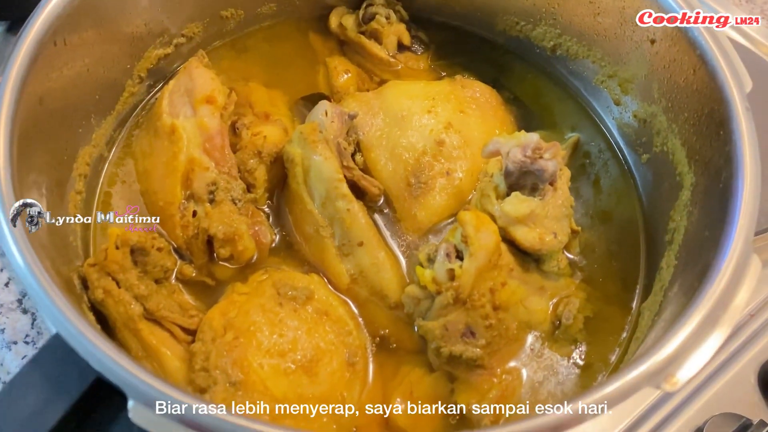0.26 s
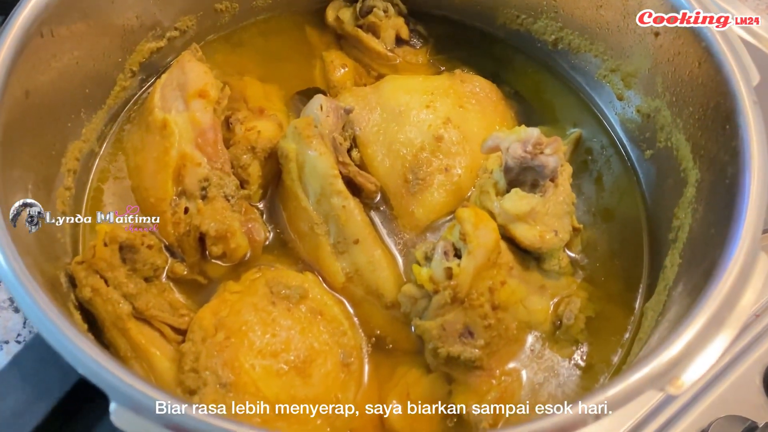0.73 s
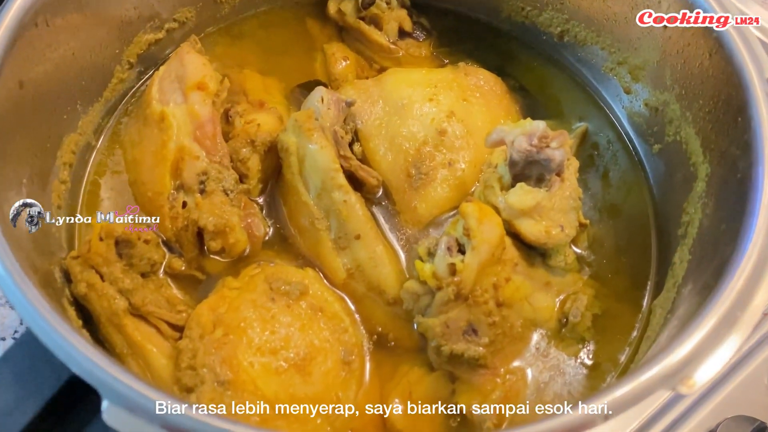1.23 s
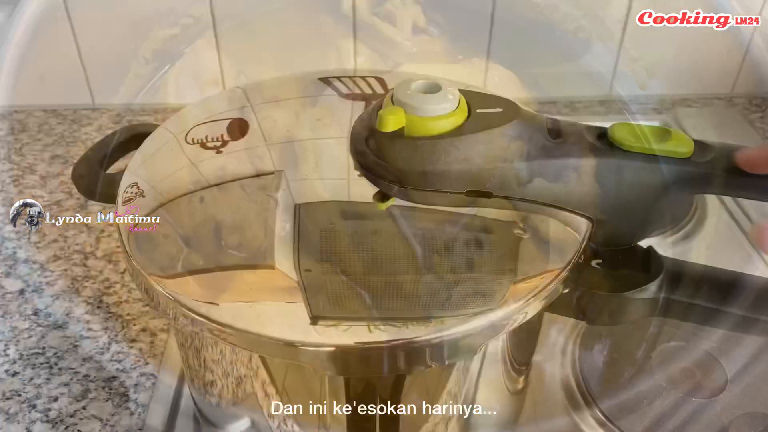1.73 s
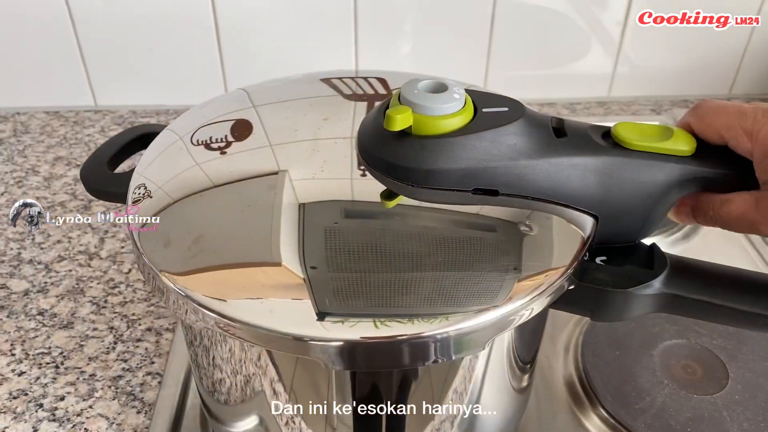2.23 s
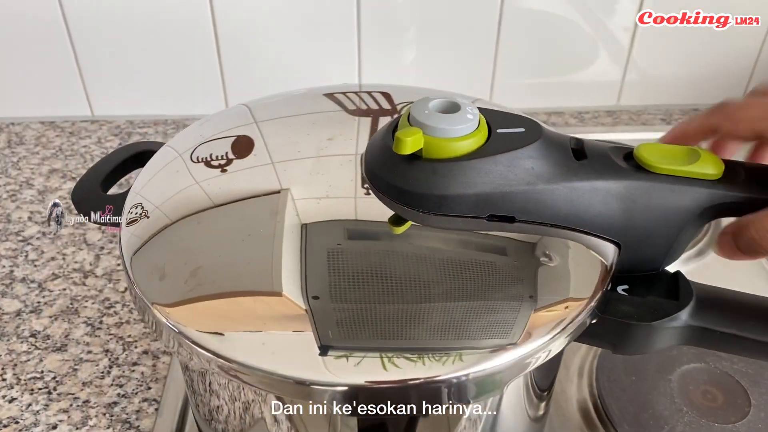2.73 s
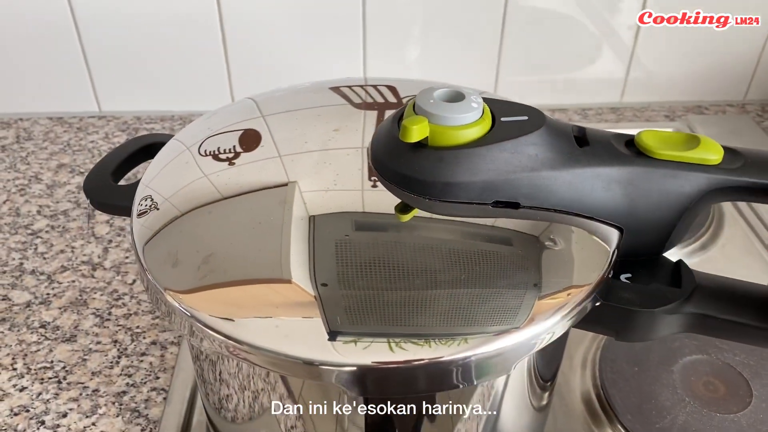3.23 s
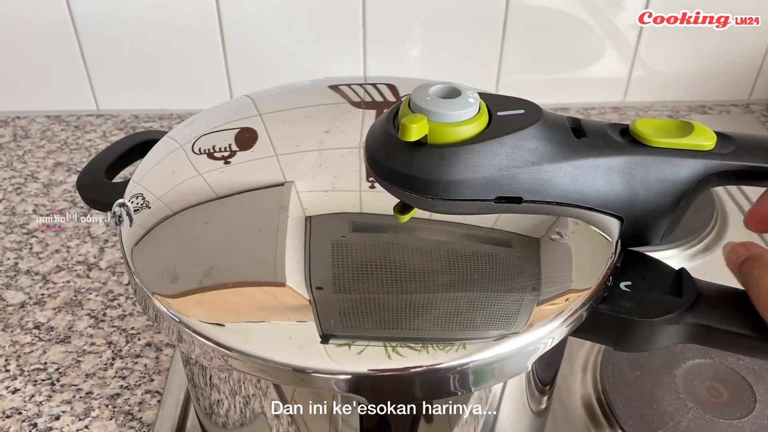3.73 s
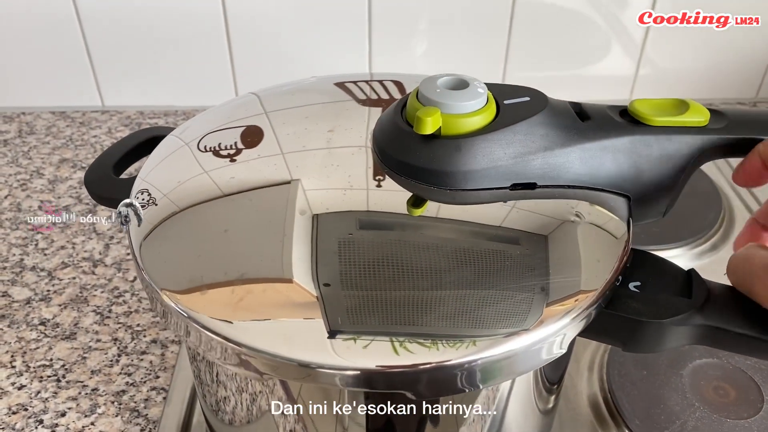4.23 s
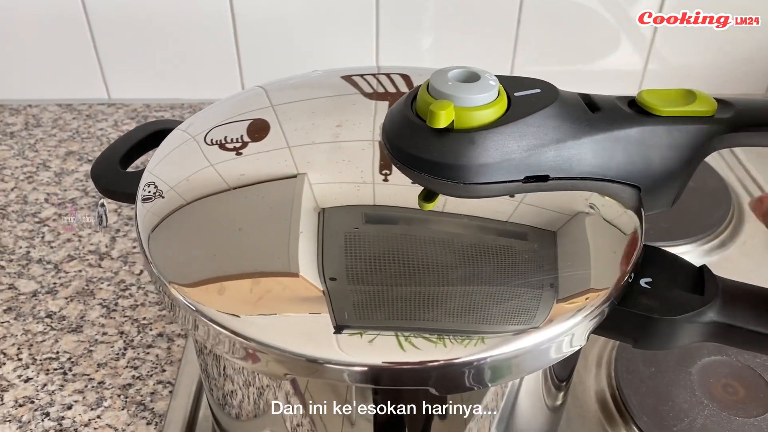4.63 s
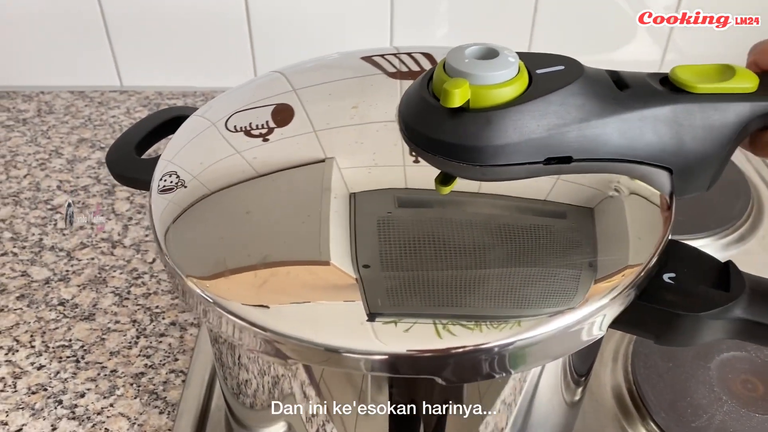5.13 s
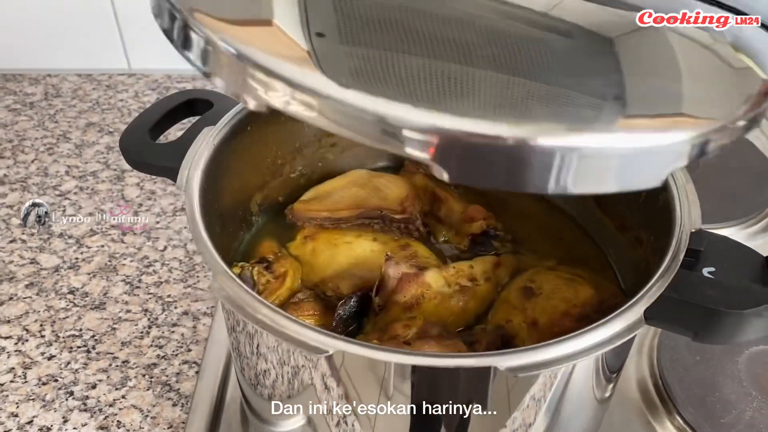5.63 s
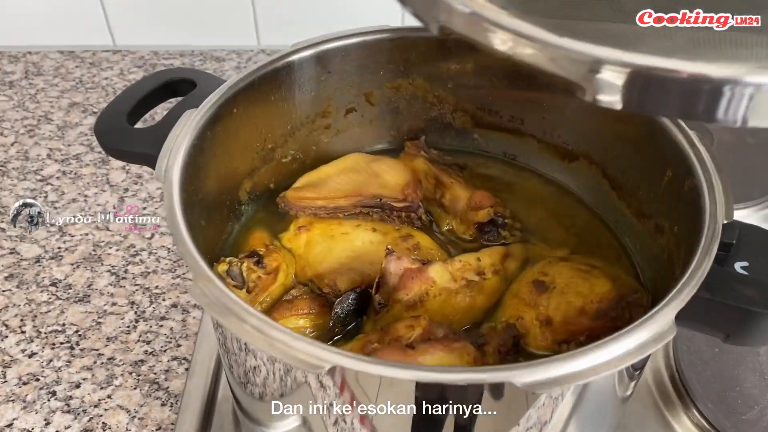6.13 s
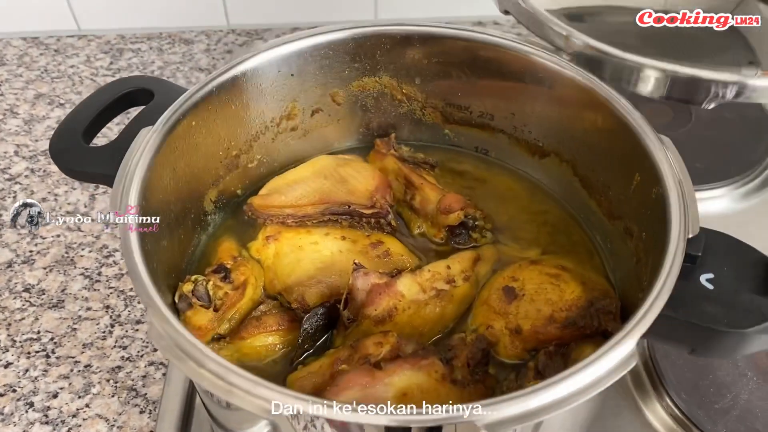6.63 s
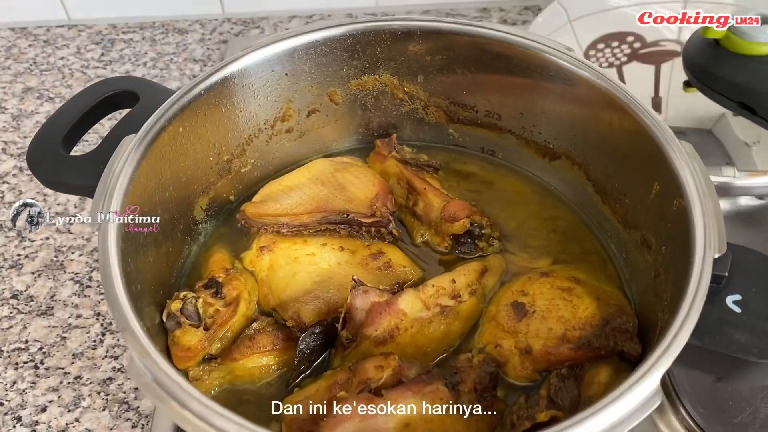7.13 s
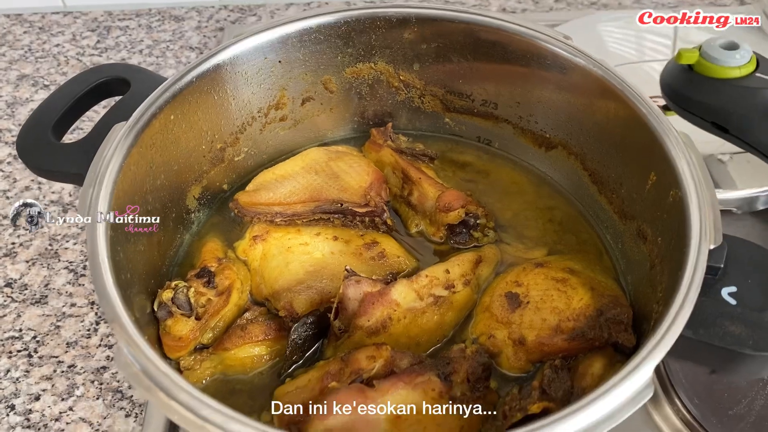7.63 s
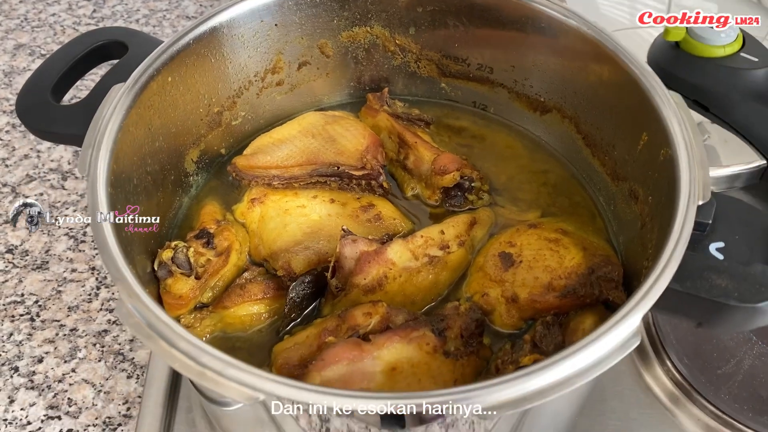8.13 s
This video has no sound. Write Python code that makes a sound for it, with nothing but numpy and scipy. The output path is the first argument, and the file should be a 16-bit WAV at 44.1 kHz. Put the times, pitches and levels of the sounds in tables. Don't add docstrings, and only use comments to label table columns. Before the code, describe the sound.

Near silence with faint finger rubs, then latch clicks, metal lid knocks on a pot rim, a loud clack, and a rocking landing on a worktop.

```python
import sys
import numpy as np
from scipy import signal
from scipy.fft import rfft, irfft, next_fast_len
from scipy.io import wavfile
from scipy.ndimage import uniform_filter1d, map_coordinates

SR = 44100
rng = np.random.default_rng(int(sys.argv[2]) if len(sys.argv) > 2 else 0)


def materialize(psi):
    bounded = np.clip(np.atleast_2d(psi).T, -1, 1)
    quanta = np.round(bounded * 32767).astype(np.int16)
    wavfile.write(sys.argv[1], SR, quanta)


def convert_level_to_amplitude(level_db):
    exponent = np.asarray(level_db, float) / 20
    return 10 ** exponent


N = 369191

# pitch_hz, level_db, t60_s (time to fade by 60 dB)
HANDLE_MODES = [(466, -3.5, 0.34), (794, -7, 0.044), (840, -11.5, 0.99), (1385, -15.5, 0.1),
                (1768, 9.5, 0.036), (2565, -9, 0.51), (3810, -14.5, 0.25), (5250, -22.5, 0.07),
                (6300, -13, 0.073), (7574, -13.5, 0.2)]
POT_MODES = [(389.7, 1, 0.58), (548, -19, 0.23), (850, -5.5, 0.069), (1486, -4.5, 0.24),
             (1817, -1.5, 0.065), (2360, -25, 0.148), (2508, -12, 0.056), (2830, -5, 0.061),
             (4080, -20, 0.1243), (4560, -35.5, 0.14), (4850, -24, 0.174), (5520, -16, 0.14),
             (6130, -31, 0.13), (6370, -25, 0.15)]
LID_MODES = [(1388, -17, 0.15), (1660, 1, 0.084), (1870, -17, 0.15), (2341, -14.5, 0.11),
             (2640, -8.5, 0.14), (2810, -6.5, 0.087), (3510, -10, 0.16), (3940, -9, 0.16),
             (4380, -16.5, 0.098), (5660, -7.5, 0.068), (5950, -22.5, 0.39), (6474, -18.5, 0.15),
             (7300, -12.5, 0.062), (7300, -20.5, 0.17)]
ROCKING_LID_MODES = [(492.7, -7.5, 0.22), (684, -8.5, 0.24), (733, -10, 0.17), (855, -11.5, 0.25),
                     (998, -15.5, 0.08), (1600, 1.5, 0.035), (1839, -9, 0.15), (2310, -27, 0.13),
                     (2595, -13, 0.14), (2830, -2, 0.065), (3415, -6, 0.034)]
WORKTOP_MODES = [(85, 2, .26), (102.5, -3, .18), (176.5, -11, .16), (226, -9, 0.13), (265.4, -11, .11)]
GRIP_MODES = [(508, -8, 0.039), (1550, 0, 0.06), (2468, 5, 0.059), (2970, -5, 0.038), (6440, -3, .06)]
LANDING_LID_MODES = [(520, -5, 0.18), (664, -34, 2.8), (711, -8.5, 0.24), (1030, -6.5, 0.24),
                     (1160, -30, 1.0), (1164, -21, 0.46), (1350, -13, 0.25), (1880, -22, 0.46),
                     (2370, -23, 0.21), (2773, -13, 0.092), (3795, -46, 0.29), (4867, -44, 0.15)]
FLAT_LID_MODES = [(843, -3.5, 0.093), (1505, -1, 0.26), (1930, -0.5, 0.11), (1990, -6, 0.13),
                  (2258, -14, 0.21), (2490, -12, 0.27), (2600, -6.5, 0.14), (2750, -4, 0.073),
                  (2790, -6, 0.17), (3070, -4.5, 0.13), (3820, -16, 0.07), (5170, -12.5, 0.17)]

# pitch_hz, level_db (per Hz)
HANDLE_CRACK = [(120, -29.5), (200, -19), (335, -22.5), (715, -16), (997, -17.5), (1770, -9), (2090, -16.5),
                (2250, -19), (11400, -24.5), (15600, -28), (16500, -57)]
POT_CRACK = [(120, -22.5), (200, -11.5), (300, -25.5), (382, -9), (628, -18), (2560, -22.5), (3630, -28.5),
             (6090, -26), (13500, -30.5), (15300, -31), (16500, -37)]
LID_CRACK = [(120, -50.5), (200, -20), (829, -20), (1340, -7.5), (1470, -19.5), (1670, -14.5),
             (2010, -15.5), (2860, -13.5), (11800, -23), (15300, -27), (16500, -37.5)]
WORKTOP_CRACK = [(120, 8), (200, 1), (329, -7.5), (829, -3), (1160, -4.5), (1500, -5.5), (3020, -16),
                 (11200, -26), (13500, -24), (15300, -28.5), (16500, -53.5)]
BUMP_CRACK = [(120, -26), (250, -2), (742, -5), (926, -10), (1250, -8), (2090, -25), (10200, -48),
              (15600, -46), (16500, -55)]
FLAT_CRACK = [(150, -31.5), (250, -4), (622, -5), (853, -1.5), (2860, -7.5), (11000, -22.5), (12900, -47.5),
              (15700, -27), (16500, -49.5)]

# start_s, peak_db, hollow_knock_db, low_thump_db, brightness_db
LATCH_CLICKS = [(1.6282, -67.5, -2, -4, -22), (1.9914, -61, 8.5, -14, -27), (2.5865, -53, -17, -11, -1),
                (2.9038, -56, 6, -22, -10), (2.9567, -59.5, 2, -3, -20), (2.9844, -66.5, -31, -6, -11),
                (3.0794, -68, -6, 17, -40), (3.1443, -55.5, -3, -15, -12), (3.1637, -41.5, 6, -7, -23.5),
                (3.6396, -66.5, 7, -14, -5), (3.8272, -66, 6, -2, -9), (4.1044, -42.5, 9.5, -10, -13),
                (4.1644, -64, -19, 7, -55), (4.2752, -44, 1.5, 4, -5), (4.3141, -27.5, -4.5, -5.5, -10.5)]
RIM_KNOCKS = [
    (4.9162, -40.5, -16.5, -14, -18.5),
    (4.9495, -37.5, -3.5, -16, -9.5),
    (4.9878, -45.5, -2.5, -16, -22.5),
    (5.0601, -30, -9, -30.5, -7.5),
    (5.1823, -38.5, -1.5, -23, -5),
    (5.2047, -40.5, -6, -25, -10.5),
    (5.2238, -47.5, -6, -3, -11),
]
LID_CLACKS = [
    (4.8597, -53, 6, -6, -4),
    (5.4001, -73.5, 23.5, 3, -31),
    (5.4703, -70.5, 34, 8, -54),
    (6.5108, -14.5, -13, -39, -15),
    (6.5289, -23, -14, -17, -17),
]
LID_CHATTER = [
    (6.5175, -20, -24, -34, -22),
    (6.556, -35, -18.5, -31, -19.5),
]
LID_LANDING = [
    (7.2765, -35.5, 0.5, 13.5, -36),
    (7.429, -17.5, -2.5, -1.5, -12),
    (7.577, -42, -3, -25, -36.5),
    (7.595, -43.5, -6, -25, -29.5),
]
LID_ROCKS = [
    (7.8611, -26, 0.5, 7.5, -16.5),
    (7.911, -34.5, -3, 8, -13.5),
    (7.947, -37.5, -2, 6, -13),
    (7.973, -38, 4, -8, -25),
    (7.995, -54.5, 7, -5, -20),
    (8.016, -40, 7, -23, -32),
    (8.0359, -18, 5, 16, -19.5),
    (8.0535, -16.5, -4.5, 13, -11),
]
LID_FALL = [
    (8.1305, -14.5, -5.5, -32, -15),
    (8.143, -23.5, 8, 6, -18.5),
    (8.195, -52, 6, 16.5, -15),
]
GRIP_TAPS = [
    (1.42, -70, 14, -12, -60),
    (5.742, -79, -13, 2, -19),
    (5.7697, -60, 23, -3.5, -53),
    (6.328, -53, 8.5, -0.5, -12.5),
    (6.335, -57.5, -2.5, -9.5, -9),
    (6.394, -70, 7.5, -10, -17),
    (7.0782, -80.5, -16, -8, -13),
]

# start_s, peak_db, hollow_knock_db, brightness_db, contact_ms
SOFT_BUMPS = [
    (0.973, -61, 2, -55, 54),
    (1.782, -62, 2, -52, 50),
    (3.885, -58, 0, -30, 50),
]
LATCH_GRAZES = [
    (1.659, -86, -20, 11, 5),
    (3.121, -66, -40, -7, 29),
    (3.757, -59, 14, -24, 18),
    (4.08, -54.5, -15, -14.5, 32),
    (6.501, -46.5, -29, -21.5, 16),
]
LANDING_SCUFFS_ON_TOP = [
    (7.423, -52, -10, -23, 10),
    (7.452, -24, 1.5, -25, 4.6),
    (7.49, -33.5, -3, -14, 15),
    (7.58, -43, -8.5, -19, 38),
]
ROCKING_SCUFFS = [
    (8.002, -36, 1, -13, 41),
    (8.079, -22.5, 1, -17, 12),
    (8.118, -35.5, -4, -17.5, 16),
    (8.7, -35, -39, -3, 15),
]

# start_s, peak_db, pitch_hz, t60_s
PING_TOUCHES = [(3.882, -55, 600, 0.041), (3.893, -51, 790, 0.054), (3.912, -49, 660, 0.065),
                (3.955, -47.5, 553, 0.055), (4.009, -50.5, 850, 0.055), (4.045, -55.5, 486, 0.105),
                (4.081, -49.5, 1730, 0.1), (4.166, -48.5, 1650, 0.039), (4.86, -49, 1643, 0.079),
                (4.878, -51, 1754, 0.072), (4.917, -43, 1840, .05), (5.061, -38, 1750, 0.048),
                (5.075, -52, 1458, .15), (4.95, -46, 2910, 0.014), (4.989, -48, 2600, 0.017),
                (5.062, -43, 2600, 0.054), (5.205, -45, 2750, 0.033), (5.222, -44, 2800, 0.047),
                (5.222, -54, 5500, 0.1), (5.223, -49, 1950, 0.036), (5.228, -53, 2500, 0.086),
                (5.226, -58, 4000, 0.063), (5.224, -60, 4900, 0.065), (5.224, -58.5, 6760, 0.074),
                (5.262, -53.5, 645, 0.069), (6.529, -20, 1685, .07), (7.275, -47, 1146, 0.035),
                (7.277, -50, 1770, 0.035), (7.429, -33, 2750, 0.054), (7.432, -36, 528, .07),
                (7.863, -41, 735, 0.091), (7.911, -43, 728, 0.091), (7.947, -47, 740, .1),
                (7.975, -51, 2790, 0.045), (7.579, -46, 1140, .05), (7.59, -50, 1100, 0.065),
                (7.591, -46, 724, 0.085), (7.91, -52, 2800, 0.03), (7.946, -57, 2800, 0.049),
                (8.014, -37, 960, 0.033), (8.036, -21, 1580, 0.024), (8.036, -24.5, 986, 0.037),
                (8.054, -34, 713, 0.096), (8.132, -22.5, 2980, 0.037), (8.131, -28, 1939, 0.032)]

# start_s, length_s, scrape_db, fizz_over_scrape_db, drag_over_scrape_db
STROKES = [(0.15, 0.16, -99, -3, 7.5), (1.743, 0.18, -99.5, -4.5, 10), (1.942, 0.36, -94, 0.5, -17),
           (2.254, 0.17, -96, -21, -15), (2.501, 0.11, -87.5, -1.5, 0), (2.966, 0.12, -99, 4, -10),
           (3.129, 0.3, -98, 0.5, 20.5), (3.482, 0.087, -83.5, -3.5, 12), (3.637, 0.24, -93.5, 4.5, -13),
           (3.902, 0.058, -75.5, -2, 10.5), (4.003, 0.11, -81, -2, 15.5), (4.114, .08, -88.5, 2.5, 16.5),
           (4.666, 0.055, -92, 2.5, -16.5), (4.784, 0.1, -91.5, 5.5, -2), (7.564, 0.019, -83, -9, -7),
           (7.694, 0.14, -97, -7.5, 15), (7.865, 0.13, -90, -22, 11)]
# pitch_hz, width_hz, level_db
SCRAPE_PEAKS = [(1700, 130, 2), (3050, 280, -5), (4100, 300, -8), (5500, 450, -11), (2500, 3000, -11)]
# pitch_hz, level_db (per Hz)
FIZZ_COLOUR = [(2650, -27.5), (4500, -13), (5530, -8.5), (10900, -7.5), (12300, -5), (13400, -30),
               (15500, -1), (16200, -20), (16500, -49)]
DRAG_COLOUR = [(150, -28.5), (250, -11.5), (516, 4), (576, -4.5), (1230, -11), (1300, -19.5), (1690, -9),
               (2860, -120)]

# start_s, level_db, pitch_hz, t60_s
CAMERA_JOLTS = [(0.2, -67.5, 45.5, 0.52), (.82, -46, 54, 0.66), (0.972, -62, 53, 1.47),
                (1.28, -64.5, 54, 0.71), (1.45, -79, 52, 1.4), (1.621, -75.5, 78, 0.85),
                (1.802, -66, 117, 0.63), (1.9, -68, 50, 0.26), (2.1, -66, 113, 0.46), (2.55, -72, 110, 1.2),
                (2.922, -65.5, 107, 1.06), (3.152, -59.5, 133, 0.89), (3.351, -70.5, 143, 2.3),
                (3.56, -56, 85, 0.45), (3.779, -58.5, 104, 0.45), (3.948, -55.5, 124, 0.6),
                (4.12, -50, 168, 0.38), (4.22, -48.5, 100, 0.21), (4.7, -60.5, 89, 0.58),
                (4.862, -51.5, 124, 0.26), (5.1, -58.5, 101.3, 0.76), (5.461, -64, 73.7, 1),
                (5.628, -55, 98, 0.61), (5.739, -49, 70.5, 0.2), (6.551, -51, 84, 0.62),
                (7.17, -57.5, 85, 0.47), (7.791, -57.5, 55.1, 0.52), (8.231, -37.5, 81, 0.33)]

# start_s, level_db
MURMUR_LEVEL = [(0, -95), (.6, -84.5), (1.35, -85.5), (2.34, -81), (5.3, -78.5), (6.3, -81), (6.9, -84.5),
                (7.3, -78.5), (8.37, -75)]
# pitch_hz, level_db (per Hz)
MURMUR_COLOUR = [(90, -20), (160, 1.5), (250, -4.5), (400, 0.5), (520, -9), (650, -15), (1000, -22.5),
                 (1500, -46.5)]
HISS_COLOUR = [(400, -20), (900, 0), (2000, -5), (4000, -10), (9000, -16), (16000, -30)]

# pitch_hz, likeness (0 to 1)
LIKENESS = [(150, .95), (600, .75), (1050, .5), (2000, .7), (8500, .6), (10000, .98), (11000, .95),
            (12000, .6)]
# pitch_hz, lead_rad
LEFT_LEAD = [(300, -.1), (600, -.2), (1050, -1), (1600, -.6), (2500, 0), (4000, .4), (9000, 0), (10300, 0),
             (11700, -.9), (13000, 1), (15000, 2.2)]
# pitch_hz, left_minus_right_db
LEFT_LEAN = [(600, 0), (1300, -2), (2500, 1), (4000, 2.5), (8500, 3), (9800, 0)]
# pitch_hz, level_db
TREBLE = [(11800, 15), (13200, -13), (14300, 14), (15800, 14.5), (16400, -1)]

LATCH_MS, RIM_MS, CLACK_MS, ROCK_MS = 6.2, 9.2, 2.1, 9.5
NEAR_SPREAD, ROOM_SPREAD = 0.6, 2.5


def knocks():
    blown = latch() + rim() + clack() + chatter() + landing() + rocking() + flat() + grip() + bumps()
    return filtered(blown, lambda hz: (1j * hz / (66 + 1j * hz)) ** 4)


def latch():
    return blows(firm(LATCH_CLICKS, LATCH_MS) + glancing(LATCH_GRAZES), HANDLE_MODES, HANDLE_CRACK,
                 crack_s=0.041, crack_db=-9.5, ring_db=-17, damp=0.49, peaky=0.46,
                 room_db=-23, room_s=0.3, thump_db=-7, bright_db=-7, knock_db=-6)


def rim():
    return blows(firm(RIM_KNOCKS, RIM_MS), POT_MODES, POT_CRACK,
                 crack_s=0.048, crack_db=-14, ring_db=-20, damp=0.9, peaky=1,
                 room_db=-22, room_s=0.25, thump_db=-5.5, bright_db=-5.5, knock_db=-9)


def clack():
    return blows(firm(LID_CLACKS, CLACK_MS), LID_MODES, LID_CRACK,
                 crack_s=0.052, crack_db=-12.5, ring_db=-17, damp=0.9, peaky=2.7,
                 room_db=-26, room_s=0.3, thump_db=-5.5, bright_db=-9.5, knock_db=-18)


def chatter():
    return blows(firm(LID_CHATTER, CLACK_MS), LID_MODES, LID_CRACK,
                 crack_s=0.029, crack_db=-9, ring_db=-16.5, damp=0.44, peaky=2.9,
                 room_db=-28.5, room_s=0.3, thump_db=-2.5, bright_db=-12, knock_db=-23.5)


def landing():
    return blows(firm(LID_LANDING, ROCK_MS) + glancing(LANDING_SCUFFS_ON_TOP), LANDING_LID_MODES, WORKTOP_CRACK,
                 crack_s=0.044, crack_db=-20, ring_db=-19, damp=0.54, peaky=1.5,
                 room_db=-22.5, room_s=0.23, thump_db=-10.5, bright_db=-13.5, knock_db=-3.5)


def rocking():
    return blows(firm(LID_ROCKS, ROCK_MS) + glancing(ROCKING_SCUFFS), ROCKING_LID_MODES, WORKTOP_CRACK,
                 crack_s=0.056, crack_db=-19.5, ring_db=-28, damp=0.9, peaky=0.37,
                 room_db=-23.5, room_s=0.3, thump_db=-20, bright_db=-11.5, knock_db=-6)


def flat():
    return blows(firm(LID_FALL, CLACK_MS), FLAT_LID_MODES, FLAT_CRACK,
                 crack_s=0.037, crack_db=-13, ring_db=-23.5, damp=0.9, peaky=0.75,
                 room_db=-25.5, room_s=0.3, thump_db=-7, bright_db=-13, knock_db=-6)


def grip():
    return blows(firm(GRIP_TAPS, LATCH_MS), GRIP_MODES, POT_CRACK,
                 crack_s=0.042, crack_db=-7.5, ring_db=-16.5, damp=0.4, peaky=0.93,
                 room_db=-23.5, room_s=0.3, thump_db=-7.5, bright_db=-5.5, knock_db=2)


def bumps():
    return blows(glancing(SOFT_BUMPS), POT_MODES, BUMP_CRACK,
                 crack_s=0.3, crack_db=-6, ring_db=-25.5, damp=0.57, peaky=0.5,
                 room_db=-4, room_s=0.3, thump_db=-19.5, bright_db=-16, knock_db=-0.8)


def firm(events, contact_ms):
    return [(*row, contact_ms) for row in events]


def glancing(events):
    return [(s, db, knock, -20, bright, ms) for s, db, knock, bright, ms in events]


def blows(events, modes, tone, crack_s, crack_db, ring_db, damp, peaky, room_db, room_s,
          thump_db, bright_db, knock_db):
    out = np.zeros((2, N + SR))
    t = np.arange(SR // 2) / SR
    for start_s, db, knock, thump, bright, contact_ms in events:
        contact_s = contact_ms / 1000
        tilt = [(700, knock - knock_db), (1300, 0.014), (3500, 0.015), (8000, bright - bright_db)]
        colour = crack_colour(modes, tone, tilt, peaky)
        tick = spread(noise(len(t)), lambda hz: colour(hz) * hz / 1500, NEAR_SPREAD) * fade(t, 0.027)
        crack = spread(noise(len(t)), colour, NEAR_SPREAD) * fade(t - contact_s, crack_s)
        middle = ringing(t, modes, tilt, damp)
        side = ringing(t, modes, tilt, damp)
        steel = middle + 0.5 * side * np.array([[1], [-1]])
        rise = 1 - np.exp(-t / (0.000046 + 3 * contact_s ** 2))
        near = convert_level_to_amplitude(crack_db) * (crack + tick) + convert_level_to_amplitude(ring_db) * steel + convert_level_to_amplitude(room_db) * room_tail(t, colour, room_s)
        boom = convert_level_to_amplitude(thump + thump_db) * worktop_thump(t)
        place(out, start_s, convert_level_to_amplitude(db) * (near * rise + boom))
    return out[:, :N]


def crack_colour(modes, tone, tilt, peaky):
    struck = [(c, db / 3 + rng.normal(0, 2.3)) for c, db, _ in modes]

    def colour(hz):
        peaks = sum(convert_level_to_amplitude(db) / (1 + ((hz - c) / (25 + 0.012 * c)) ** 2) for c, db in struck)
        return convert_level_to_amplitude(along(tone, hz) + along(tilt, hz)) * (1 + peaky * peaks)
    return colour


def ringing(t, modes, tilt, damp):
    total = 0
    for hz, level_db, t60_s in modes:
        strength = convert_level_to_amplitude(level_db + along(tilt, hz) + rng.normal(0, 2))
        total = total + strength * fade(t, min(t60_s, 0.2) * damp) * swing(hz, len(t))
    return total


def swing(hz, count):
    hold = 128
    steps = np.repeat(rng.standard_normal(count // hold + 1), hold)[:count]
    return np.sin(2 * np.pi * hz / SR * np.cumsum(1 + 0.006 * steps) + rng.uniform(0, 6))


def worktop_thump(t):
    hum = sum(convert_level_to_amplitude(db) * fade(t, t60_s) * np.sin(2 * np.pi * hz * t) for hz, db, t60_s in WORKTOP_MODES)
    return hum * (1 - np.exp(-(t / 0.0059) ** 2))


def room_tail(t, colour, room_s):
    decay = fade(t, room_s) + convert_level_to_amplitude(-18) * fade(t, 0.42)
    return spread(noise(len(t)), colour, ROOM_SPREAD) * decay * (1 - np.exp(-t / 0.0023))


def pings():
    out = np.zeros((2, N + SR))
    t = np.arange(SR // 4) / SR
    for start_s, db, pitch_hz, t60_s in PING_TOUCHES:
        width_hz = 0.025 * pitch_hz
        rattle = spread(noise(len(t)), lambda f: 1 / (1 + ((f - pitch_hz) / width_hz) ** 2), NEAR_SPREAD)
        rise = 1 - np.exp(-t / 0.0027)
        place(out, start_s, convert_level_to_amplitude(db - 4.5) * fade(t, t60_s) * rise * rattle)
    return out[:, :N]


def rubbing():
    scrape_gain, fizz_gain, drag_gain = np.zeros((3, N))
    for start_s, length_s, db, fizz_db, drag_db in STROKES:
        shape = stroke(start_s, length_s)
        scrape_gain += convert_level_to_amplitude(db + 6) * shape
        fizz_gain += convert_level_to_amplitude(db + fizz_db + 5) * shape
        drag_gain += convert_level_to_amplitude(db + drag_db + 1) * shape

    def metal(f):
        peaks = sum(convert_level_to_amplitude(db) / (1 + ((f - c) / width) ** 2) for c, width, db in SCRAPE_PEAKS)
        return peaks * (f > 900) / (1 + (f / 6000) ** 4)
    scrape = rush(metal, grit_db=2.4)
    fizz = rush(lambda f: convert_level_to_amplitude(along(FIZZ_COLOUR, f)), grit_db=1.2)
    drag = rush(lambda f: convert_level_to_amplitude(along(DRAG_COLOUR, f)), grit_db=2.5)
    return scrape_gain * scrape + fizz_gain * fizz + drag_gain * drag


def stroke(start_s, length_s):
    rise_s, fall_s = 0.03, 0.08
    corners = np.cumsum([start_s - rise_s, rise_s, length_s, fall_s])
    return np.interp(np.arange(N) / SR, corners, [0, 1, 1, 0]) ** 2


def jolts():
    out = np.zeros((2, N + SR))
    t = np.arange(SR) / SR
    rise_s = 0.051
    for start_s, db, pitch_hz, t60_s in CAMERA_JOLTS:
        shake = spread(noise(SR), low_band(pitch_hz, 0.34), closer=1.4)
        place(out, start_s - rise_s, convert_level_to_amplitude(db) * fade(t, t60_s) * np.clip(t / rise_s, 0, 1) * shake)
    return out[:, :N]


def room():
    murmur_db = np.interp(np.arange(N) / SR, *np.transpose(MURMUR_LEVEL))
    murmur = convert_level_to_amplitude(murmur_db) * rush(lambda f: convert_level_to_amplitude(along(MURMUR_COLOUR, f)), grit_db=1.5)
    sliding = sum(stroke(start_s, length_s) for start_s, length_s, *_ in STROKES)
    busy = uniform_filter1d(sliding, round(0.12 * SR))
    quiet_db, busy_db = -99, -93.5
    hiss_gain = convert_level_to_amplitude(quiet_db + (busy_db - quiet_db) * busy)
    hiss = hiss_gain * rush(lambda f: convert_level_to_amplitude(along(HISS_COLOUR, f)), grit_db=0.3)
    deep = convert_level_to_amplitude(-88) * rumble(65.3, 0.53)
    upper = convert_level_to_amplitude(-80.5 + (murmur_db + 76.5) / 2) * rumble(118, 0.32)
    return murmur + hiss + deep + upper


def rumble(pitch_hz, width):
    return spread(noise(N), low_band(pitch_hz, width), closer=0.5) * convert_level_to_amplitude(3 * wobble(9))


def low_band(pitch_hz, width):
    return lambda f: np.exp(-(np.log(f / pitch_hz + 1e-9) / width) ** 2)


def rush(gain, grit_db):
    flutter = convert_level_to_amplitude(grit_db * wobble(81) + grit_db * wobble(28))
    return spread(noise(N) * flutter, gain, closer=0.95)


def wobble(rate):
    knots = rng.standard_normal(int(N * rate / SR) + 4)
    return map_coordinates(knots, [np.arange(N) * rate / SR])


def spread(pair, gain, closer):
    def shares(hz):
        turn = np.arccos(along(LIKENESS, hz) ** closer) / 2
        return gain(hz) * np.array([np.cos(turn), np.sin(turn)])
    middle, side = filtered(pair, shares)
    return unit(np.array([middle + side, middle - side]))


def noise(count):
    return rng.standard_normal((2, count))


def fade(t, t60_s):
    return convert_level_to_amplitude(-60 * np.clip(t, 0, None) / t60_s)


def place(out, start_s, sound):
    first = round(start_s * SR)
    out[:, first:first + sound.shape[1]] += sound


def unit(x):
    return x / np.sqrt(np.mean(x ** 2) + 1e-20)


def along(points, hz):
    f, v = np.transpose(points)
    return np.interp(np.log(hz + 1), np.log(f + 1), v)


def filtered(x, response):
    size = next_fast_len(x.shape[-1] + 4096)
    spectrum = rfft(x, size) * response(np.fft.rfftfreq(size, 1 / SR))
    return irfft(spectrum, size)[..., :x.shape[-1]]


def scene():
    return knocks() + pings() + rubbing() + jolts() + room()


def band_limit(x):
    return signal.sosfilt(signal.butter(12, 16960, fs=SR, output="sos"), x)


def record(dry):
    def ports(hz):
        half_difference = np.exp(0.5j * along(LEFT_LEAD, hz)) * convert_level_to_amplitude(along(LEFT_LEAN, hz) / 2)
        left_right = half_difference ** np.array([[1], [-1]])
        return left_right * convert_level_to_amplitude(along(TREBLE, hz)) * (hz < 16700)
    heard = filtered(dry, ports)
    mix = heard / (1 + np.abs(heard / 0.95) ** 6) ** (1 / 6)
    return band_limit(mix)


dry = scene()
out = record(dry)
materialize(out)
```